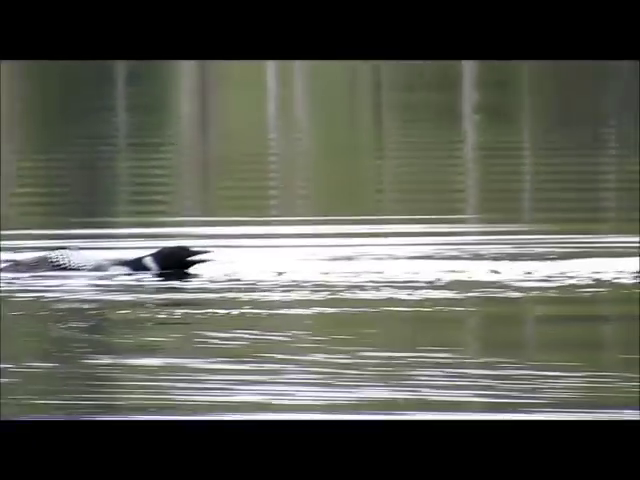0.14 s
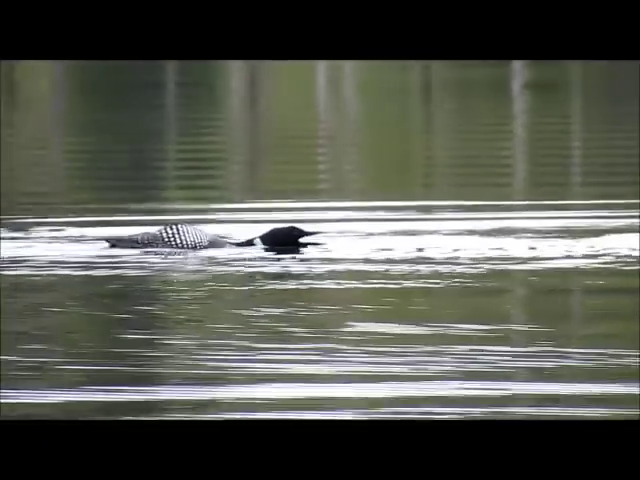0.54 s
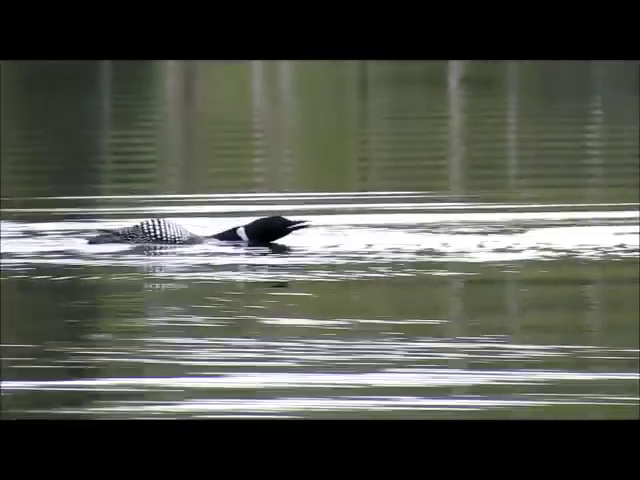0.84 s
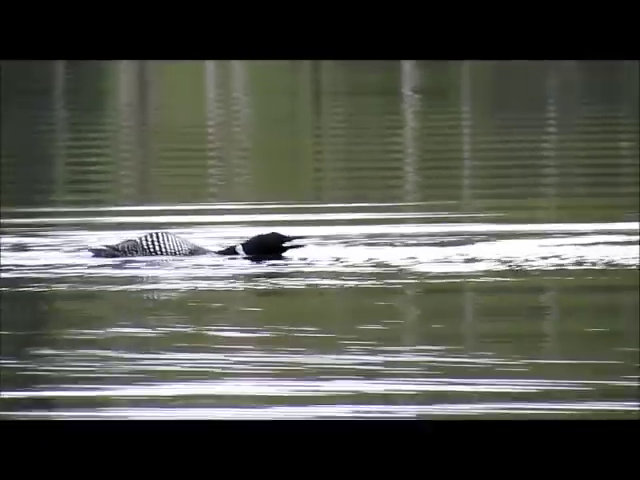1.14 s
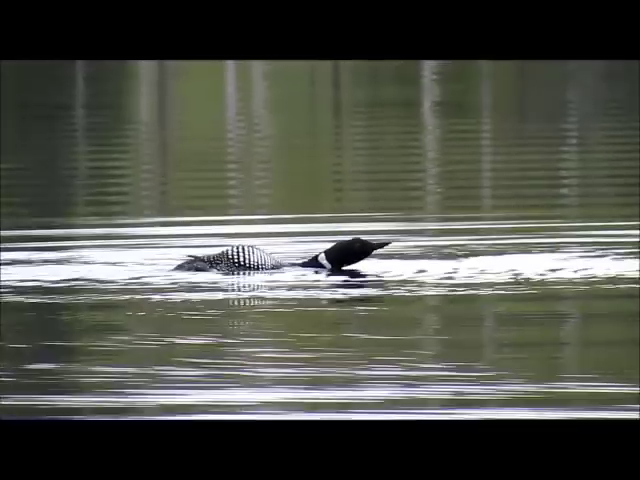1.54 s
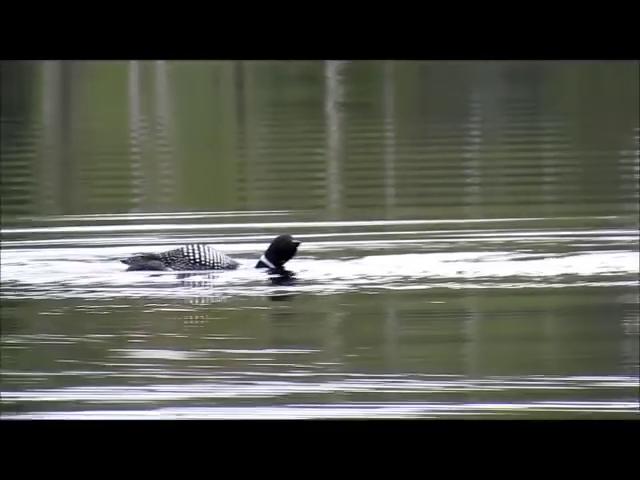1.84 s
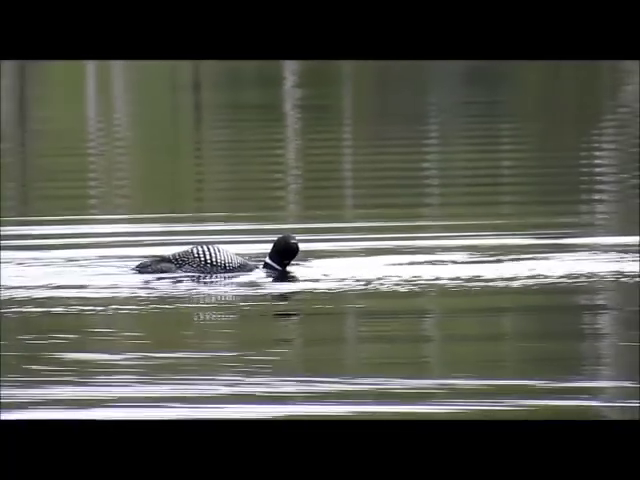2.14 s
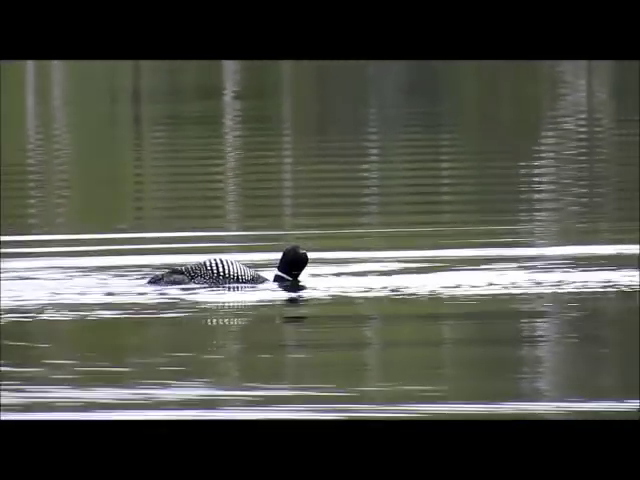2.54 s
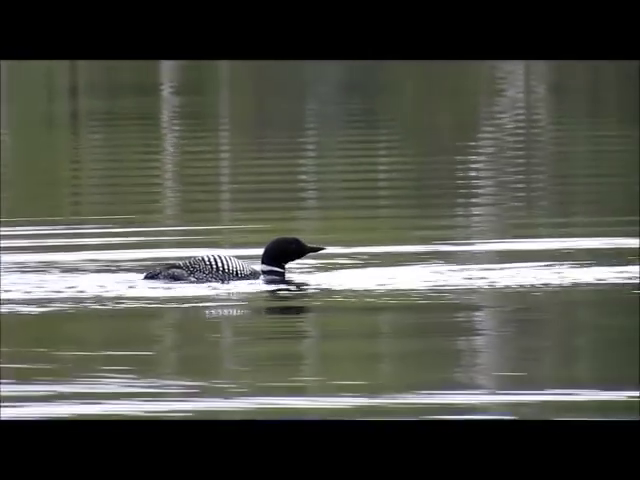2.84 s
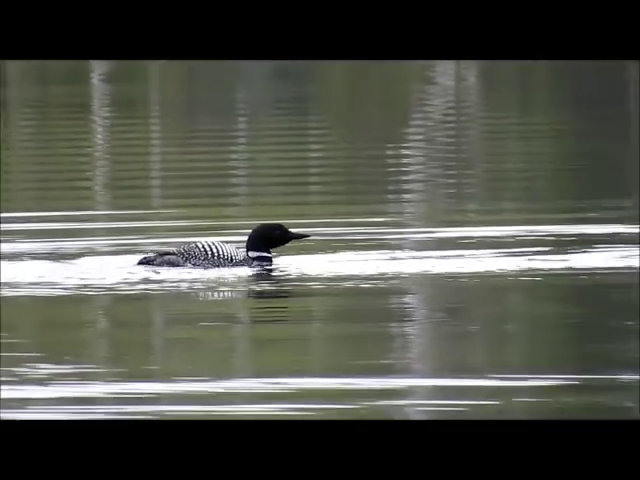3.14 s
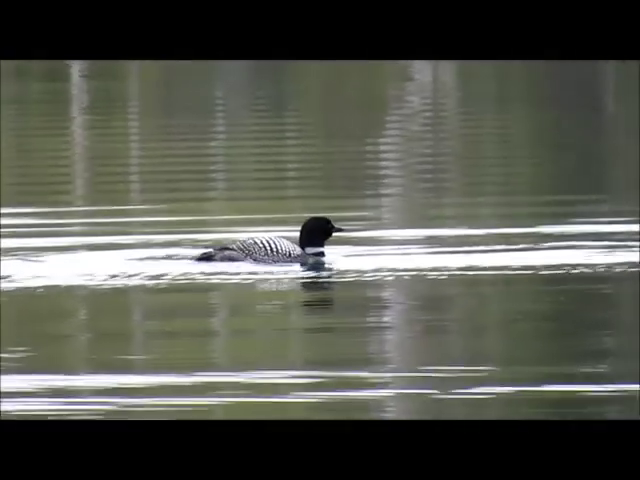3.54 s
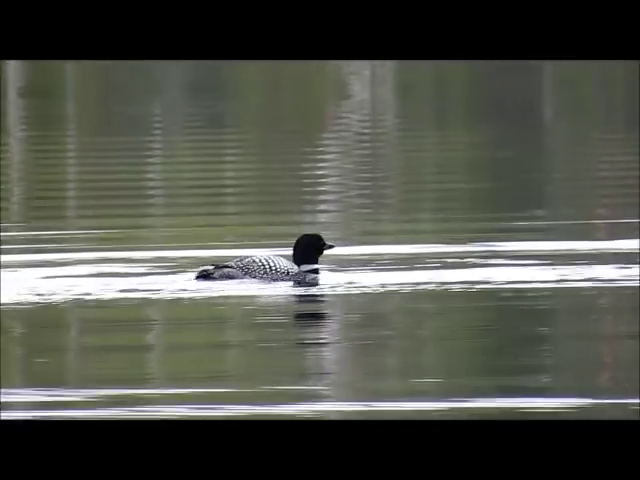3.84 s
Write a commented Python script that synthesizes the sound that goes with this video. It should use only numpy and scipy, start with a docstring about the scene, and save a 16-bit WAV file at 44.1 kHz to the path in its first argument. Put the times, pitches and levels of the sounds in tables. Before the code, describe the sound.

Wild loon yodel on still water: held whistled notes break and flip, leaving a soft wooded echo.

```python
"""A loon yodels almost straight ahead on a calm lake: clear held notes break up into a rough two-voiced
register and flip down through lower ones. Each register is an unsteady oscillator with its overtones.
Decaying noise tails give the faint answer of the wooded shore. Far away a songbird's gliding tones
whistle and trill; close by a few tiny ticks sound as noise bursts. The camera adds coloured hiss and hum."""
import sys
import numpy as np
from scipy import signal
from scipy.fft import rfft, irfft, next_fast_len
from scipy.io import wavfile
from scipy.ndimage import map_coordinates

SR = 44100
rng = np.random.default_rng(int(sys.argv[2]) if len(sys.argv) > 2 else 0)


def to_wav(sig):
    """Store sig (one row per channel, or 1-D mono) as 16-bit WAV at the path in sys.argv[1].

    Samples outside -1..1 are clipped; the rate is SR.
    """
    pcm = np.clip(np.atleast_2d(sig), -1, 1) * 32767
    pcm = np.round(pcm).astype(np.int16)
    wavfile.write(sys.argv[1], SR, pcm.T)  # frames by channels


N = 176400


def amp(db):
    """Amplitude ratio of a level in dB."""
    return 10 ** (np.asarray(db) / 20)


def unit(x):
    """x scaled to rms 1."""
    return x / np.sqrt(np.mean(x ** 2) + 1e-20)


def along(points, hz):
    """Read (f/Hz, value) points on a log frequency axis."""
    f, v = np.transpose(points)
    return np.interp(np.log(hz + 1), np.log(f + 1), v)


def filtered(x, response):
    """x times a response of frequency, padded so that little wraps round."""
    m = next_fast_len(N + SR // 2)
    spectrum = rfft(x, m) * response(np.fft.rfftfreq(m, 1 / SR))
    return irfft(spectrum, m)[..., :N]


def noise(colour):
    """Noise of rms 1 with the given (f/Hz, level/dB) colour."""
    return unit(filtered(rng.standard_normal(N), lambda hz: amp(along(colour, hz))))


def wobble(t, rate):
    """A smooth random curve through normal random knots, rate knots a second."""
    return map_coordinates(rng.standard_normal(4096), [t * rate], mode="wrap")


def note(rows, fade_s):
    """Times, fade gate and control curves of one note; each fade is centred on an end of the note."""
    s, *cols = np.transpose(rows)
    first = max(0, int((s[0] - fade_s) * SR))
    last = min(N, int((s[-1] + fade_s) * SR))
    t = np.arange(first, last) / SR
    to_edge = np.minimum(t - s[0], s[-1] - t)
    gate = np.sin(np.pi / 2 * np.clip(to_edge / fade_s + .5, 0, 1)) ** 2
    return (t, gate, *[np.interp(t, s, c) for c in cols])


def glide(row):
    """A straight glide as a two-point curve."""
    start, end, hz0, hz1, db0, db1 = row
    return [(start, hz0, db0), (end, hz1, db1)]


def add(out, t, x):
    """Mix x in at its times."""
    out[np.round(t * SR).astype(int)] += x


def oscillator(t, hz, db, jitter):
    """A complex tone of rms level db; pitch (by the share jitter) and loudness tremble at random."""
    shimmer_db = 0.16
    phase = 2 * np.pi * np.cumsum(hz * (1 + jitter * wobble(t, 350))) / SR
    return np.sqrt(2) * amp(db + shimmer_db * wobble(t, 200)) * np.exp(1j * phase)


def overtones(t, z, size, levels_db, rich_db=0):
    """Overtones as powers of a vibration z of the given size; each wavers on its own."""
    waver_db = 3.7
    # added level of the overtones above the second harmonic: (t/s, level/dB)
    brightness = [(0, 1.5), (.06, 1), (.15, -8.5), (.27, -0.5), (.38, -9.5), (.7, 3), (.78, 3),
                  (.84, -13.5), (.97, -11.5), (1.05, -0.5), (1.15, -3.5), (1.28, 9.5), (1.42, -8),
                  (1.52, 3), (1.58, 3)]
    bright_db = np.interp(t, *np.transpose(brightness))
    total = 0
    for k, db in enumerate(levels_db, 2):
        level_db = db + rich_db + bright_db * (k > 2) + waver_db * wobble(t, 30)
        total = total + size * amp(level_db) * ((z / size) ** k).imag
    return total


def tail(delay, t60):
    """A diffuse echo of energy 1: noise that starts after the delay (s) and falls 60 dB in t60 (s)."""
    t = np.arange(N) / SR
    decay = (t > delay) * amp(-60 * abs(t - delay) / t60)
    return unit(rng.standard_normal(N) * decay) / np.sqrt(N)


def yelp(row):
    """The curve of one yelp: a quick swell on a falling pitch."""
    # the shape that the yelps share: (share of the length, f/Hz, level/dB re the peak)
    yelp_shape = [(0, 1993, -6.5), (.25, 1860, 0), (.6, 1825, -2.5), (1, 1731, -7.5)]
    start, length, peak_db = row
    return [(start + share * length, hz, peak_db + db) for share, hz, db in yelp_shape]


def loon():
    """The yodel: one vibration in the clear and low registers, two mixing voices in the high breaks."""
    # held notes, one list each: (t/s, f/Hz, level/dB of the fundamental)
    held = [
        [(0.0, 1812, -38.5), (0.046, 1884, -40.5), (0.086, 1864, -35.5), (0.136, 1822, -38),
         (0.196, 1841, -39.5), (0.26, 1894, -41), (0.278, 1952, -44)],
        [(0.714, 1778, -44), (0.728, 1849, -39), (0.752, 1911, -37), (0.796, 1980, -43), (0.806, 2020, -45.5)],
        [(0.902, 1934, -39.5), (0.91, 1927, -36), (0.982, 1885, -36.5), (1.016, 1819, -37.5),
         (1.035, 1734, -42.5)],
        [(1.25, 1821, -43.5), (1.268, 1832, -39), (1.302, 1866, -37), (1.358, 1883, -35.5), (1.44, 1869, -36.5),
         (1.504, 1921, -38.5), (1.534, 1985, -43.5)],
    ]
    # yelps that end a phrase: (start t/s, length/s, peak level/dB of the fundamental)
    yelps = [(.405, .017, -37), (1.608, 0.01995, -35.5)]
    # the sinking note after the second phrase: (t/s, f/Hz, level/dB of the fundamental)
    sink = [(1.037, 1574, -38), (1.048, 1505, -40), (1.066, 1460, -41.5), (1.085, 1422, -49),
            (1.097, 1358, -59)]
    # steps in the low registers: (start t/s, end t/s, from f/Hz, to f/Hz, from level/dB, to level/dB)
    low_steps = [(.421, .425, 1557, 1430, -48.5, -55), (0.423, .434, 1260, 1100, -53, -54.5),
                 (0.677, 0.693, 689, 760, -60.5, -66), (0.688, 0.709, 1030, 1190, -48, -48.5),
                 (0.711, 0.722, 1578, 1740, -50.5, -55), (1.1, 1.181, 1036, 918, -51.5, -63),
                 (1.179, 1.21, 613, 635, -64.5, -63.5), (1.212, 1.22, 644, 730, -56.5, -57.5),
                 (1.218, 1.237, 1012, 1150, -54, -45.5), (1.24, 1.249, 1578, 1650, -46, -43.5),
                 (1.628, 1.634, 1582, 1440, -48, -58), (1.631, 1.642, 1246, 1090, -48.5, -54)]
    # high breaks, one list each:
    # (t/s, lower voice f/Hz, its level/dB, upper voice f/Hz, its level/dB, roughness 0-1)
    breaks = [
        [(.28, 2060, -48, 2330, -76, 0.2), (.335, 2147, -48, 2385, -73, 0.2),
         (.358, 2210, -50.5, 2419, -57, .4), (.37, 2232, -53.5, 2410, -48, .5),
         (.378, 2244, -71, 2420, -51, .2), (.39, 2178, -71.5, 2350, -49, .3),
         (.405, 2087, -50, 2320, -57.5, 0.8)],
        [(.807, 2145, -47, 2381, -66.5, .5), (.83, 2148, -51.5, 2374, -51, .15),
         (.878, 2120, -48, 2392, -50.5, .15), (.889, 2090, -50, 2352, -50.5, 1),
         (.902, 1960, -42.5, 2405, -53.5, 0.6)],
        [(1.535, 2140, -47, 2338, -81, 0.4), (1.548, 2085, -49.5, 2335, -52.5, 0.8),
         (1.562, 2205, -59, 2345, -47.5, 0.9), (1.582, 2240, -59, 2330, -47, 0.4),
         (1.609, 2118, -54, 2263, -51.5, 1)],
    ]
    # overtones from the second harmonic up, before waver, brightness and throat: (level/dB re fundamental)
    clear_db = [-37.5, -40.5, -52]
    sink_db = [-43.5, -35.5, -34]
    low_register_db = [-11.5, -24, -26.5, -30]  # at the reference pitch
    high_db = [-20, -24.5, -49.5]  # re the size of the two voices together
    # colour that throat and bill give the overtones: (f/Hz, level/dB)
    throat = [(1250, 9), (1800, -7.5), (2200, -0.5), (2800, -2.5), (3300, -11), (3750, 1), (4000, -6.5),
              (4300, -2), (4700, 3.5), (5100, -5), (5650, 2.5), (6200, -3), (7500, -3), (8200, -6)]
    low_fall_db_per_octave, low_ref_hz = 15.5, 930  # the lower the step, the richer, down to 0.9 of this
    flip_s = .004  # time to change register
    jitter, high_jitter = 0.0011, 0.012  # share of the pitch; the high one at full roughness
    sideband_db = -13.5  # the two voices mix into a third tone below them
    linger_hz, linger_db = 1965, -56  # clear register that still sounds in a fully rough break

    tone, upper = np.zeros(N), np.zeros(N)
    notes = [(rows, clear_db, 0) for rows in list(held) + [yelp(row) for row in yelps]]
    notes += [(sink, sink_db, 0)]
    notes += [(glide(row), low_register_db, low_fall_db_per_octave) for row in low_steps]
    for rows, levels_db, fall_db in notes:
        t, gate, hz, db = note(rows, flip_s)
        z = oscillator(t, hz, db, jitter)
        rich_db = -fall_db * np.log2(np.maximum(hz / low_ref_hz, .9))
        add(tone, t, gate * z.imag)
        add(upper, t, gate * overtones(t, z, abs(z), levels_db, rich_db))

    for rows in breaks:
        t, gate, low_hz, low_db, up_hz, up_db, rough = note(rows, flip_s)
        low = oscillator(t, low_hz, low_db, high_jitter * rough)
        up = oscillator(t, up_hz, up_db, high_jitter * rough)
        size = np.hypot(abs(low), abs(up))
        sideband = amp(sideband_db) * low ** 2 * up.conj() / size ** 2  # at twice the lower minus the upper
        linger = rough * oscillator(t, linger_hz, linger_db, high_jitter)
        z = low + up - sideband + linger
        add(tone, t, gate * z.imag)
        add(upper, t, gate * overtones(t, z, size, high_db))
    return tone + filtered(upper, lambda hz: amp(along(throat, hz)))


def background():
    """Hiss and wavering camera hum, whose bass is mostly opposed in the two channels."""
    # hiss colour common to both channels, then opposed in them: (f/Hz, relative level/dB per Hz)
    air_mid = [(20, -16.5), (60, 2.5), (100, -2), (180, -4), (450, -11), (750, -6), (1300, -14.5),
               (2500, -19), (3500, -21), (3950, -29.5), (4400, -24), (7400, -27), (7950, -31.5),
               (8400, -30), (12500, -32.5), (15000, -45.5)]
    air_side = [(20, -3.5), (45, -4), (78, 1.5), (110, -3.5), (190, -1.5), (290, -9), (470, -10),
                (700, -14.5), (1100, -19), (1800, -27.5), (3400, -31), (3950, -42.5), (4400, -35),
                (7400, -38.5), (7950, -43.5), (8400, -40.5), (12500, -45), (15000, -53)]
    mid_db, side_db = -69, -60  # rms of the hiss, common and opposed
    # camera hum: (f/Hz, common level/dB, opposed level/dB)
    hum = [(64.8, -81.5, -72), (77.4, -88, -78), (119.3, -83.5, -68.5), (182.3, -88.5, -78.5),
           (240, -84, -71), (297, -85, -72), (359.5, -89.5, -76), (419, -90, -80), (475.5, -89, -80.5),
           (619, -88.5, -89), (720, -87, -90)]
    t = np.arange(N) / SR
    mid, side = amp(mid_db) * noise(air_mid), amp(side_db) * noise(air_side)
    for hz, hum_mid_db, hum_side_db in hum:
        phase = 2 * np.pi * (hz * t + rng.random()) + 0.57 * wobble(t, 5.5)
        mid = mid + np.sqrt(2) * amp(hum_mid_db) * np.sin(phase)
        side = side + np.sqrt(2) * amp(hum_side_db) * np.cos(phase)
    return np.array([mid + side, mid - side])


def shore(call):
    """The call scattered into a long thin tail by the woods, with a late echo from the far shore."""
    # added level of the echo as it swells and sinks: (t/s, level/dB)
    echo_swell = [(.5, 3.5), (1.7, -0.5), (2.1, -3.5), (2.55, -1.5), (2.801, 1.5), (3.079, 0), (3.2, 2),
                  (3.421, 0.5), (3.65, 2.5), (3.9, 3)]
    woods = amp(-35) * tail(delay=.03, t60=9)
    far_shore = amp(-36.5) * tail(delay=1.8, t60=3.26)
    swell = amp(np.interp(np.arange(N) / SR, *np.transpose(echo_swell)))
    return swell * signal.fftconvolve(call, woods + far_shore)[:N]


def songbird():
    """Distant thin slurred whistles and a quick pulsed trill, blurred by the trees."""
    # whistles before the dry and blurred mix:
    # (start t/s, end t/s, from f/Hz, to f/Hz, from level/dB, to level/dB)
    whistles = [(.1, .15, 2746, 2835, -72, -77.5), (.16, 0.197, 2800, 2590, -81, -71.5),
                (.16, 0.296, 2914, 2880, -75, -78.5), (0.269, 0.319, 3650, 3050, -77, -76.5),
                (0.632, .68, 3470, 2800, -79, -80), (0.766, 0.919, 2940, 3560, -82, -80.5),
                (1.121, 1.212, 2810, 2696, -74, -73.5), (1.63, 1.694, 2600, 2520, -74, -80),
                (1.755, 1.77, 3620, 3250, -72, -77), (3.31, 3.366, 3230, 3030, -82, -88),
                (3.4, 3.466, 2870, 2745, -77.5, -70.5), (3.47, 3.555, 2780, 2370, -77.5, -78),
                (3.58, 3.626, 3660, 3150, -76, -80.5), (3.75, 3.807, 2810, 2310, -79, -81)]
    trill_start_s, trill_end_s, trill_per_s = 1.96, 2.33, 25
    trill_hz, trill_db = 2730, -78  # level before pulsing and mix
    blur_t60_s, wet_db, dry_db = 0.28, -2, -2.5

    out = np.zeros(N)
    for row in whistles:
        t, gate, hz, db = note(glide(row), fade_s=.012)
        add(out, t, gate * oscillator(t, hz, db + 2 * wobble(t, 60), jitter=.008).imag)

    trill = [(trill_start_s, trill_hz, trill_db), (trill_end_s, trill_hz, trill_db)]
    t, gate, hz, db = note(trill, fade_s=.04)
    pulses = np.sin(np.pi * trill_per_s * t) ** 2
    add(out, t, gate * pulses * oscillator(t, hz, db, jitter=0.019).imag)

    blur = np.array([signal.fftconvolve(out, tail(0, blur_t60_s))[:N] for ear in range(2)])
    return amp(dry_db) * out + amp(wet_db) * blur


def ticks():
    """Tiny dry noise bursts near the microphones, unlike in the two channels."""
    # faint high ticks: (t/s, peak level/dB before the trim)
    tick_peaks = [(0.5784, -51.5), (0.597, -64), (0.635, -62.5), (0.9038, -70), (1.4855, -59),
                  (1.9604, -54), (3.466, -65), (3.6651, -70), (3.685, -64)]
    # spectrum of the ticks: (f/Hz, relative level/dB)
    tick_colour = [(1500, -41), (3000, -18), (9000, -15.5), (11800, 0), (14000, -11), (16000, -21)]
    rise_s, fall_s, trim_db = .002, 0.0076, -2  # times for 60 dB
    t = np.arange(N) / SR
    envelope = 0
    for s, db in tick_peaks:
        drop_db = 60 * np.maximum((t - s) / fall_s, (s - t) / rise_s)
        envelope = envelope + amp(db + trim_db - drop_db)
    return envelope * np.array([noise(tick_colour), noise(tick_colour)])


def scene():
    """The loon almost straight ahead, placed by level and arrival time, with the lake around it."""
    # level difference of the direct call, left minus right: (f/Hz, level/dB)
    pan = [(1000, 1.5), (1850, 0.8), (1950, 1.3), (2150, -3.5), (2380, 0), (5000, 0)]
    lag_s = .000022  # the left microphone hears the bird later
    call = loon()
    sides = np.array([[.5], [-.5]])  # half of each difference to either channel

    def to_microphones(hz):
        """Level and delay of the direct call at each microphone."""
        return amp(sides * along(pan, hz)) * np.exp(-2j * np.pi * hz * sides * lag_s)

    direct = filtered(call, to_microphones)
    answer = shore(call) + sides * shore(call)  # a common part and a weaker opposed one
    return direct + answer + songbird() + ticks() + background()


def record(dry):
    """The camera keeps nothing from its band limit of 15 kHz up: a sharp spectral cut."""
    return filtered(dry, lambda hz: hz < 15000)


dry = scene()
out = record(dry)
to_wav(out)
```